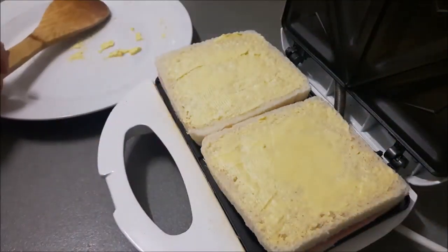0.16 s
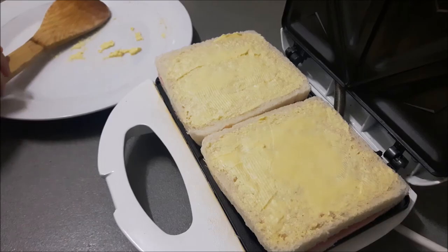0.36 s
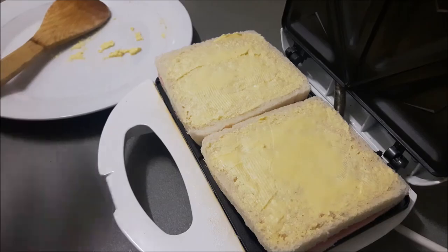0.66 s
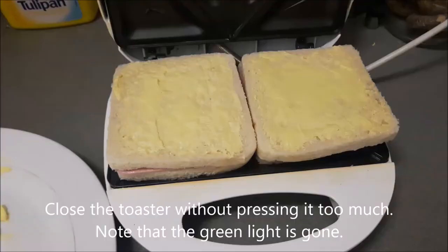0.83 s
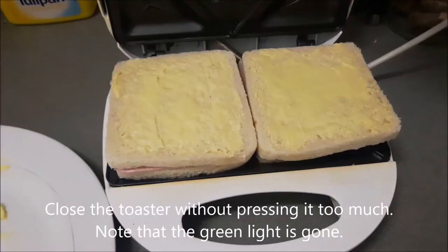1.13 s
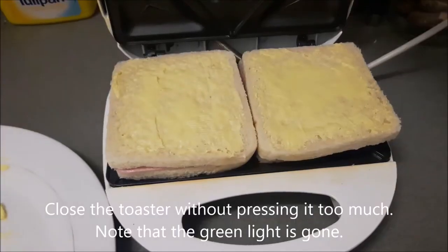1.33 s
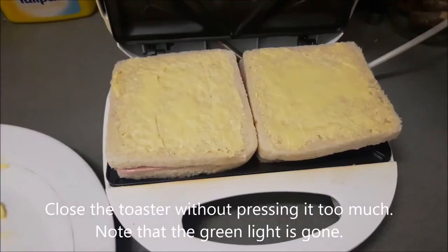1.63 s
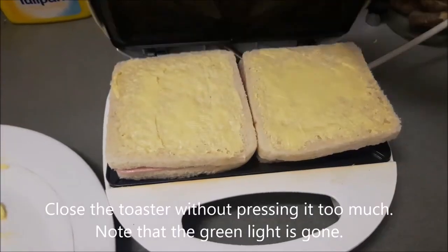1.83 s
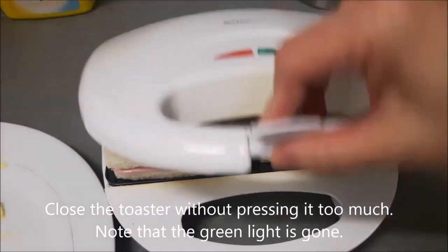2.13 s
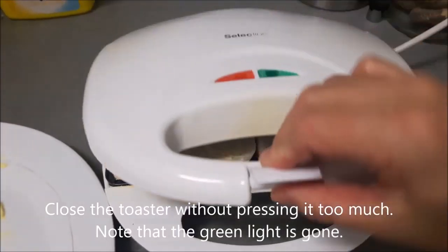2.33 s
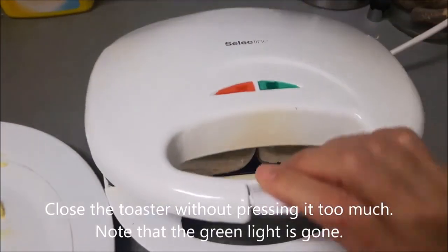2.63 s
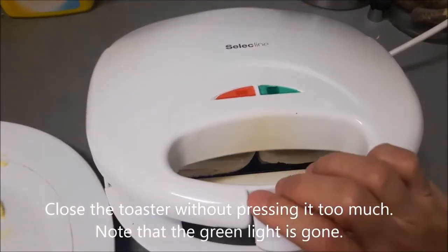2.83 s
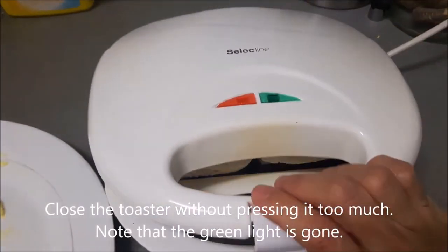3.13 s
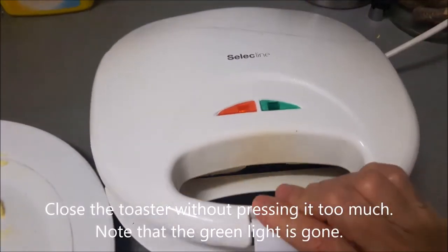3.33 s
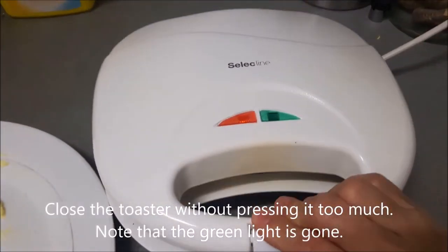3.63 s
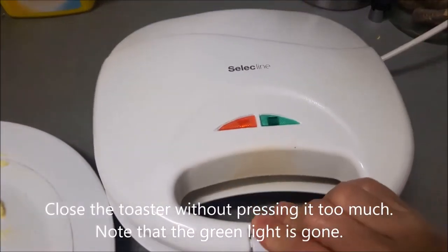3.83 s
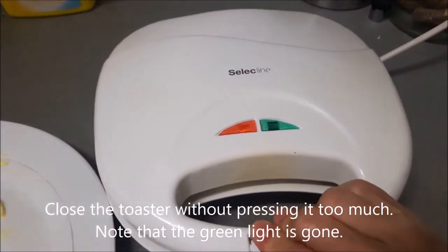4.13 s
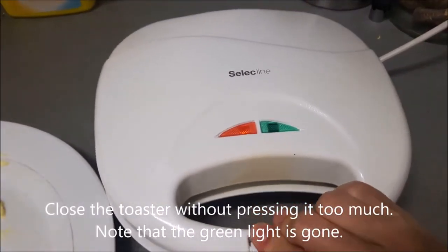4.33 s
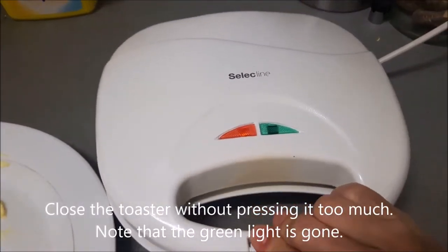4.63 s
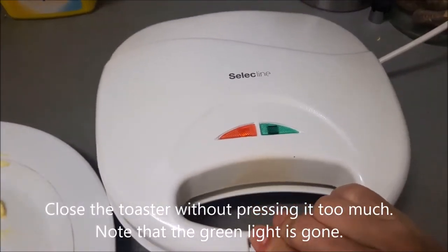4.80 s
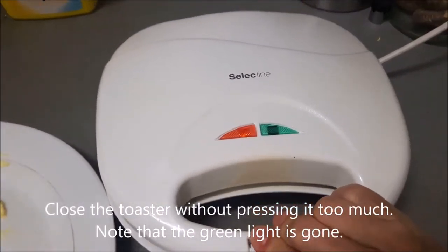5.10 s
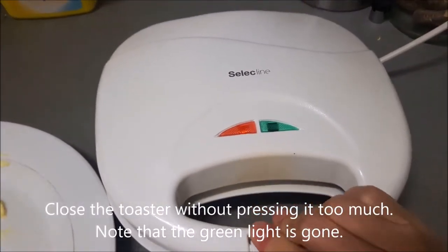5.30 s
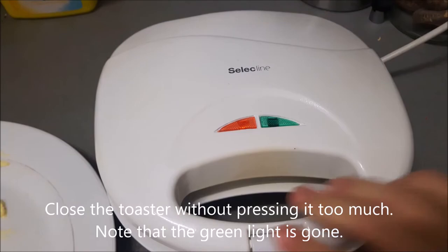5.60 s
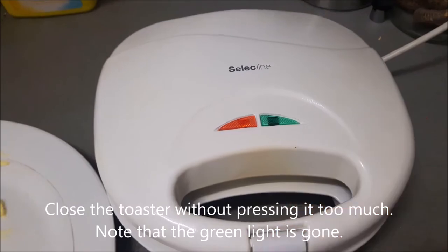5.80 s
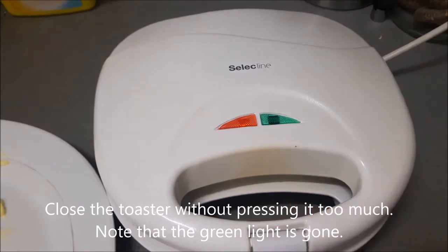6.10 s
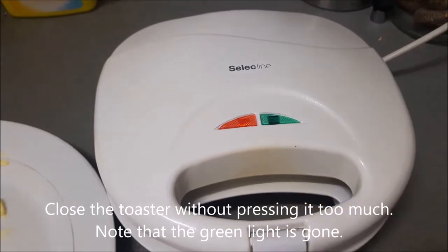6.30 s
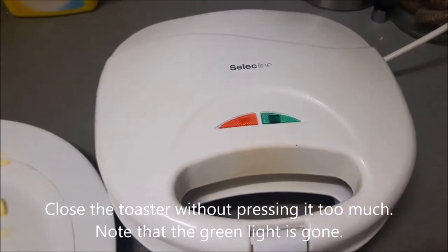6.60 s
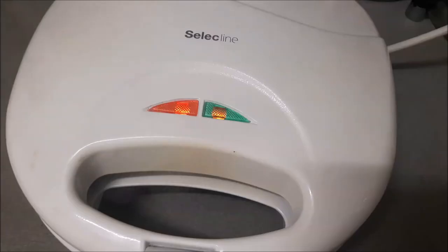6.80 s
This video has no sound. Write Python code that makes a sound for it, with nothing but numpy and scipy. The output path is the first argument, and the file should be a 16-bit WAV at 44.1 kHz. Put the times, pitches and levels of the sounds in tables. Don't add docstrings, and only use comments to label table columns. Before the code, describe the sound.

Brief bright plate clatter, a pause, then light plastic knocks, a hollow lid slam and latch, a sharp hot-fat sizzle dulling into quiet.

```python
import sys
import numpy as np
from scipy import signal
from scipy.io import wavfile
from scipy.ndimage import uniform_filter1d

SR = 44100
rng = np.random.default_rng(int(sys.argv[2]) if len(sys.argv) > 2 else 0)


def transcribe(u):
    v = np.clip(np.atleast_2d(u).T, -1, 1)
    q = np.round(v * 32767).astype(np.int16)
    wavfile.write(sys.argv[1], SR, q)


def voltage_ratio(decibels):
    exponent = np.asarray(decibels, float) / 20
    return 10 ** exponent


N = 306495


def evened(x):
    return x / np.sqrt(np.mean(x ** 2) + 1e-20)


def peaked(x):
    return x / abs(x).max()


def add(mix, s, sound):
    part = mix[round(s * SR):][:len(sound)]
    part += sound[:len(part)]


def read(points, hz):
    f, value = np.transpose(points)
    return np.interp(np.log(hz + 1), np.log(f + 1), value)


def coloured(x, points):
    hz = np.fft.fftfreq(4096, 1 / SR)
    log_gain = np.log(voltage_ratio(np.maximum(read(points, abs(hz)), -90)))
    taps = np.fft.ifft(np.exp(np.conj(signal.hilbert(log_gain)))).real[:2048]
    return signal.oaconvolve(np.atleast_2d(x), taps[None], axes=1)[:, :x.shape[-1]].reshape(x.shape)


def band(x, lo_hz, hi_hz):
    return signal.sosfilt(signal.butter(2, [lo_hz, min(hi_hz, .45 * SR)], "band", fs=SR, output="sos"), x)


def flicker(size, depth_db):
    wander = uniform_filter1d(uniform_filter1d(rng.standard_normal(N), size), size)
    return voltage_ratio(depth_db * evened(wander))


def plateau(t, start, length):
    edge_s = 0.0092
    return (np.tanh((t - start) / edge_s) - np.tanh((t - start - length) / (3 * edge_s))) / 2


def decay(t, t60):
    return voltage_ratio(-60 * t / t60)


def smeared(bursts, tail_s):
    return signal.lfilter([1], [1, -np.exp(-1 / (tail_s * SR))], bursts)


def ringing(t, hz, t60, rise_s):
    return np.sin(2 * np.pi * hz * t) * decay(t, t60) * np.minimum(t / rise_s, 1)


def struck(modes, rattle, blows):
    t, out = np.arange(SR // 2) / SR, np.zeros(N)
    hz, ring_db, t60 = np.transpose(modes)[:, :, None]
    rings = voltage_ratio(ring_db - 60 * t / t60) * np.sin(2 * np.pi * hz * t)
    for s, db, rattle_db, rattle_t60, hard_hz in blows:
        ring = (rings / np.hypot(1, hz / hard_hz)).sum(axis=0) * np.minimum(t / 0.00078, 1)
        shake = coloured(rng.standard_normal(len(t)) * decay(t, rattle_t60), rattle)
        shake = signal.lfilter(*signal.butter(2, min(0.39 * hard_hz, .45 * SR), fs=SR), shake)
        add(out, s, voltage_ratio(db) * peaked(ring) + voltage_ratio(rattle_db) * peaked(shake))
    return out


# start_s, spitting_db at the open edge, bubbling_db under the bread
FAT = [(0, -64, -64), (.52, -65.5, -67.5), (.65, -63, -61), (.888, -66, -66.5), (1.5, -59, -61.5),
       (2.1, -56.5, -59.5), (2.22, -53, -52.5), (2.58, -60.5, -61), (2.73, -53.5, -56), (2.958, -47.5, -56),
       (3.3, -42, -53.5), (3.52, -46.5, -52.5), (3.66, -50, -53.5), (3.9, -50.5, -54), (4.3, -58, -53.5),
       (5.2, -67, -63), (6.13, -81, -71), (6.701, -79.5, -69.5)]


def fat_db(t, axis):
    rows = np.array(FAT)
    return np.interp(t, rows[:, 0], rows[:, axis])


def hiss():
    return voltage_ratio(-78) * band(rng.standard_normal(N), 9000, 19000)


# pitch_hz, level_db, waver_db
HUM = [(49, -16, 1.5), (100, -9, 3), (147.4, 0, 1.5), (197, -17, 3), (295.5, -11, 2.5), (344, -20, 4),
       (400, -19, 4), (443, -21, 4)]
# start_s, length_s, extra_db
SWELLS = [
    (4.71, .18, 9),
    (5.03, .09, 7),
    (5.19, .26, 11),
]
SWELL_HZ = 295.5


def hum():
    t, out = np.arange(N) / SR, np.zeros(N)
    swell_db = sum(db * plateau(t, s, length) for s, length, db in SWELLS)
    for hz, db, waver_db in HUM:
        phase = 2 * np.pi * hz * np.cumsum(flicker(size=5000, depth_db=.03)) / SR
        level = voltage_ratio(db + swell_db * (hz == SWELL_HZ)) * flicker(size=2500, depth_db=waver_db)
        out += level * np.sin(phase)
    level = voltage_ratio(-57.5 + 0.074 * (fat_db(t, axis=2) + 56.5))
    return level * flicker(size=4000, depth_db=1.3) * evened(out)


# pitch_hz, density_db
WASH = [(15, -36.5), (25, -16), (54, -15), (92, -13), (150, -5), (220, -14), (306, -10), (593, -11),
        (731, -13.5), (870, -14), (1600, -24.5), (2080, -31), (3520, -120)]


def wash():
    t = np.arange(N) / SR
    noise = coloured(rng.standard_normal(N) * flicker(size=700, depth_db=1.5), WASH)
    follows_bubbling = voltage_ratio(-57.5 + 0.48 * (fat_db(t, axis=2) + 60))
    settling = voltage_ratio(-41 - 60 * t / 0.18)
    return (follows_bubbling + settling) * noise / np.std(band(noise, 200, 1200))


def bubbles(per_s, spread_db, tail_s, smooth):
    clumps = flicker(size=300, depth_db=4.5)
    sizes = voltage_ratio(spread_db * np.minimum(rng.exponential(1, N), 4.5))
    bursts = sizes * (rng.random(N) < clumps * per_s / SR)
    return rng.standard_normal(N) * (evened(smeared(bursts, tail_s)) + smooth)


# pitch_hz, density_db
FRYING = [(650, -24.5), (1100, 1), (1160, -16), (1280, -7), (1650, -7.5), (1820, -1.5), (2520, -1.5),
          (3460, -8.5), (4100, -4.5), (5860, -17), (7000, -13.5), (9100, -19.5), (15400, -120)]


def frying():
    steam = evened(coloured(bubbles(540, 2.3, 0.0014, 2.45), FRYING))
    return voltage_ratio(fat_db(np.arange(N) / SR, axis=2) - 3) * flicker(size=2500, depth_db=1.2) * steam


# pitch_hz, density_db
SIZZLE = [(2650, -61.5), (4500, -21.5), (5820, -15), (6270, -15), (6870, -13), (8110, -5.5), (9890, 2),
          (11400, -3.5), (12500, -10), (15100, -9.5), (16200, -10.5)]
# pitch_hz, density_db
SIZZLE_SHUT = [(3240, -26), (5500, -11), (6380, -19), (9720, 0), (11500, -7.5), (12400, -12.5),
               (15100, -17), (16200, -9.5)]
# start_s, extra_db, length_s
SURGE = [
    (2.89, -7, 0.013),
    (2.944, 5.5, 0.072),
    (3.054, 2.5, 0.13),
    (3.183, 7.5, 0.025),
    (3.24, 8.5, 0.083),
    (3.35, 6, 0.12),
]


def sizzle():
    t = np.arange(N) / SR
    lull_db = -1.5 * plateau(t, 3.1, 3.46 - 3.1)
    surge_db = lull_db + sum(db * plateau(t, s, length) for s, db, length in SURGE)
    steam = bubbles(1200, 2.5, 0.00043, 1.0)
    shut = np.interp(t, (3.3, 4.3), [0, 1])
    sound = (1 - shut) * evened(coloured(steam, SIZZLE)) + shut * evened(coloured(steam, SIZZLE_SHUT))
    return voltage_ratio(fat_db(t, axis=1) + surge_db) * sound


# start_s, level_db, body_db
SPITS = [(6.422, -69, -52), (0.7485, -37, -44), (0.76, -37, -66), (1.322, -38, -38.5), (1.4254, -34, -49),
         (1.546, -36, -32.5), (1.589, -32.5, -35.5), (1.6576, -36, -33.5), (1.713, -41, -42),
         (1.763, -38, -66), (1.885, -44, -65), (1.947, -39, -34), (2.017, -26.5, -35), (2.1697, -30.5, -55),
         (2.2036, -28, -50), (2.2235, -31, -46), (2.241, -26.5, -34), (2.374, -40, -61), (2.418, -38, -56),
         (2.8604, -34, -31.5), (5.692, -63.5, -41), (6.689, -68, -51)]
# start_s, level_db, body_db
PRESSED_SPITS = [(2.7062, -44, -54), (2.7379, -41, -51), (2.7525, -36, -48), (2.7646, -38, -60),
                 (2.7721, -32, -60), (2.7868, -34, -58), (2.7979, -40, -60), (2.8185, -38, -60),
                 (2.8329, -37, -60), (2.8506, -38, -57), (2.885, -38, -60), (2.8959, -40, -60),
                 (2.9053, -21, -48), (2.9434, -22, -53), (2.9667, -27, -48), (2.9844, -21, -56),
                 (2.9956, -24, -52), (3.0356, -30, -60), (3.0541, -27, -55), (3.0582, -24, -51),
                 (3.0696, -24, -60), (3.0833, -24, -60), (3.1004, -28, -59), (3.1066, -25, -60),
                 (3.1167, -27, -60), (3.1218, -30, -60), (3.1385, -24, -60), (3.149, -31, -60),
                 (3.1731, -30, -57), (3.1872, -30, -60), (3.2004, -25, -45), (3.213, -23, -48),
                 (3.2462, -25, -58), (3.2593, -22, -60), (3.2896, -23, -54), (3.2956, -23, -60),
                 (3.3061, -24, -60), (3.3168, -20, -51), (3.3295, -28, -60), (3.3379, -18, -60),
                 (3.3482, -27, -60), (3.3551, -26, -52), (3.3817, -25, -60), (3.3948, -25, -57),
                 (3.411, -29, -60), (3.4152, -20, -51), (3.463, -27, -60), (3.4675, -28, -57),
                 (3.4734, -28, -60), (3.4811, -31, -60), (3.4944, -27, -60), (3.502, -31, -56),
                 (3.5077, -30, -60), (3.5267, -30, -60), (3.5514, -35, -60), (3.5691, -33, -60),
                 (3.6166, -37, -60)]
# start_s, level_db, body_db
SEAM_SPITS = [(3.8435, -46, -61), (4.1155, -46, -61), (4.134, -41, -56), (4.1829, -40, -57),
              (4.2133, -39, -57), (4.4747, -39, -43), (4.547, -43, -59), (4.686, -46, -64),
              (4.786, -47, -56), (4.864, -48, -65), (4.9933, -44, -64), (5.1178, -49, -65),
              (5.2245, -60, -69), (5.2899, -54, -71), (5.4564, -42, -50)]
# start_s, level_db
CREAKS = [(1.2915, -66), (1.4122, -55), (1.4451, -51), (1.4614, -44), (1.508, -42), (1.5293, -42),
          (1.557, -38), (1.6177, -43), (1.6506, -34), (1.6968, -37.5), (1.7345, -51), (1.771, -50),
          (1.798, -42), (1.8093, -34.5), (1.8524, -48), (2.0294, -36), (2.0424, -42), (2.0544, -47),
          (2.0884, -44), (2.103, -38), (2.125, -48), (2.156, -55), (2.2688, -33.5), (2.291, -40),
          (2.345, -45), (2.4713, -54), (4.702, -51), (5.5943, -57), (5.6114, -63), (5.7084, -59)]
# start_s, level_db
CRACKLES = [(0.0288, -48), (0.0639, -51), (0.0826, -41), (0.1825, -46), (0.2271, -47), (0.2326, -44),
            (0.2528, -46), (0.2922, -44), (0.2993, -48), (0.3084, -47), (0.3775, -52), (0.4102, -51),
            (0.6093, -47), (0.647, -50), (0.6623, -45), (0.6768, -42), (0.7224, -47), (0.7836, -42),
            (0.7994, -49), (0.8455, -41), (0.8576, -48), (1.2815, -59), (1.3023, -57), (1.38, -49),
            (1.4044, -49), (1.4148, -46), (1.4456, -43), (1.4676, -44), (1.474, -45), (1.5089, -44),
            (1.529, -45), (1.7356, -34), (1.7476, -37), (1.8531, -37), (1.8918, -37), (1.9111, -43),
            (1.9245, -42), (1.9636, -36), (1.9951, -36), (2.0888, -39), (2.1018, -39), (2.1216, -39),
            (2.1377, -42), (2.157, -39), (2.2332, -29), (2.2557, -33), (2.2834, -35), (2.4083, -36),
            (2.4243, -40), (2.4622, -44), (2.6015, -39), (2.6341, -39)]
# pitch_hz, level_db, t60_s
POP_RINGS = [(1620, -10.5, 0.033), (2720, 1, 0.0062), (4080, -3.5, 0.0083)]


def spits():
    trim_db = -2.5
    rows = SPITS + [(s, db - .6, body_db) for s, db, body_db in SEAM_SPITS]
    rows = rows + [(s, -90, db - 2.5) for s, db in CREAKS]
    rows += [(s, db + trim_db, body_db) for s, db, body_db in PRESSED_SPITS]
    rows += [(s, db + trim_db, db - 19) for s, db in CRACKLES]
    t, out = np.arange(2000) / SR, np.zeros(N)
    a, b = rng.standard_normal((2, len(rows), len(t)))
    fizz, thinness = rng.standard_normal((2, len(rows), 1))

    burst = np.sign(a) * decay(t, .0018)
    tail = 0.13 * a * decay(t, 0.1) + 0.3 * abs(fizz) * a * decay(t, 0.009)
    snaps = coloured(burst + tail, SIZZLE)
    snaps = snaps - np.clip(0.12 + 0.25 * thinness, 0, 1) * np.roll(snaps, 1, axis=1)

    pops = 0.68 * band(b * decay(t, 0.0084), 1700, 5500)
    for hz, db, t60 in POP_RINGS:
        detune, strength = rng.standard_normal((2, len(rows), 1))
        pops = pops + voltage_ratio(db + 2.0 * strength) * ringing(t, hz * (1 + 0.014 * detune), t60, .0005)
    for (s, db, body_db), snap, pop in zip(rows, snaps, pops):
        add(out, s, voltage_ratio(db + 2.5) * peaked(snap) + voltage_ratio(body_db - 2.0) * peaked(pop))
    return out


# start_s, length_s, level_db
HANDLING = [
    (1.489, 0.54, -65),
    (1.643, 0.23, -63),
    (2.185, 0.082, -48),
    (2.51, 0.13, -65),
]
# from_hz, to_hz
TICK_HZ = [
    (450, 1050),
    (800, 2200),
    (2100, 3500),
    (3600, 5300),
]


def rustle():
    t = np.arange(N) / SR
    ticks = voltage_ratio(3.0 * np.minimum(rng.exponential(1, N), 2.4)) * (rng.random(N) < 640 / SR)
    part, grit = rng.integers(0, len(TICK_HZ), N), rng.standard_normal(N)
    sound = np.zeros(N)
    for k, (lo_hz, hi_hz) in enumerate(TICK_HZ):
        puffs = grit * smeared(ticks * (part == k), 0.0025)
        sound += voltage_ratio(-3.5 * k) * evened(band(puffs, lo_hz, hi_hz))
    return evened(sound) * sum(voltage_ratio(db) * plateau(t, s, length) for s, length, db in HANDLING)


# start_s, level_db, pitch_hz, rise_s, t60_s
BOOMS = [
    (.001, -46, 144, .005, 0.4),
    (0.482, -39.5, 149, 0.024, 0.54),
    (0.551, -37.5, 100, 0.022, .4),
    (0.629, -45.5, 150, 0.03, 0.56),
    (.7, -40.5, 101, .03, 0.23),
    (1.674, -35, 96.8, 0.026, 0.44),
    (1.749, -45.5, 192, 0.023, 0.22),
    (1.868, -39, 102, 0.024, 0.17),
    (2.022, -27.5, 99, 0.011, 0.27),
    (0.149, -42.5, 100.4, 0.028, 0.28),
]


def booms():
    t, out = np.arange(SR // 4) / SR, np.zeros(N)
    for s, db, hz, rise_s, t60 in BOOMS:
        fade_out = np.cos(2 * np.pi * t) ** 2
        add(out, s, voltage_ratio(db) * peaked(ringing(t, hz, t60, rise_s)) * fade_out)
    return out


# start_s, level_db, pitch_hz, upper_db
KNOCKS = [(1.647, -59, 490, -63), (1.667, -28, 679, -52), (1.666, -37, 396, -57), (1.709, -47, 759, -45),
          (1.777, -38, 366, -63), (1.869, -44, 536, -50), (1.956, -41.5, 386, -46), (2.201, -35, 524, -40),
          (2.222, -32, 650, -52), (2.239, -24.5, 757, -62), (2.261, -56, 301, -53), (2.271, -47, 877, -56),
          (2.306, -38, 533, -52), (2.333, -42.5, 345, -52), (2.427, -42, 510, -68),
          (2.525, -31, 390, -41.5), (2.546, -25.5, 434, -42), (2.577, -38, 414, -58),
          (2.863, -60, 896, -37), (3.146, -42, 550, -42.5), (5.594, -48, 345, -50.5),
          (5.658, -52, 301, -51), (5.692, -42.5, 533, -45), (5.952, -53, 377, -50.5),
          (6.434, -53, 504, -59), (6.479, -44, 298, -45.5), (6.536, -50, 326, -49.5),
          (6.599, -50, 301, -59.5), (6.686, -41.5, 345, -45.5), (6.701, -57, 533, -49)]
# start_s, level_db, pitch_hz, upper_hz, upper_db
CATCH = [(1.589, -36.5, 500, 2300, -46), (1.727, -36.5, 504, 1510, -50.5), (1.801, -42, 496, 1270, -42.5),
         (1.825, -36.5, 477, 2080, -33), (1.826, -42, 480, 1680, -36.5), (2.002, -30.5, 995, 1600, -26),
         (2.004, -34.5, 380, 1740, -37), (2.0143, -33, 510, 2180, -33), (2.181, -50, 503, 2200, -42.5),
         (2.240, -25.5, 358, 1830, -38), (2.861, -40, 900, 1960, -36), (4.254, -38, 430, 2460, -37.5),
         (4.643, -48, 675, 1840, -45.5), (5.693, -61, 700, 1790, -42), (5.698, -48, 540, 990, -47),
         (5.594, -48, 620, 2600, -54), (2.86, -63, 2800, 4190, -36), (6.687, -50, 600, 1720, -48)]


def knocks():
    t, out = np.arange(SR // 4) / SR, np.zeros(N)
    shell = [(s, db, hz, 0.044, 952, upper_db) for s, db, hz, upper_db in KNOCKS]
    latch = [(s, db, hz, 0.025, upper_hz, upper_db) for s, db, hz, upper_hz, upper_db in CATCH]
    for s, db, hz, t60, upper_hz, upper_db in shell + latch:
        a, b = rng.standard_normal((2, len(t)))
        low_rattle = band(a * decay(t, 2.0 * t60), 0.61 * hz, 1.53 * hz)
        low = peaked(ringing(t, hz, t60, 0.00068)) + 0.38 * peaked(low_rattle)
        upper_rattle = band(b * decay(t, 0.71 * t60), 0.97 * upper_hz, 1.47 * upper_hz)
        upper = peaked(ringing(t, upper_hz, 0.72 * t60, 0.00049)) + 0.64 * peaked(upper_rattle)
        add(out, s, voltage_ratio(db) * peaked(low) + voltage_ratio(upper_db + 0.5) * peaked(upper))
    return out


# pitch_hz, level_db, t60_s
LID = [(191.6, -12, 0.2), (345, -10.5, 0.053), (384, 8.5, 0.041), (496, 6, 0.023), (700, -12, 0.055),
       (900, -9, 0.025), (1400, -10, 0.05), (1560, 5.5, 0.02), (2030, -5, 0.0097)]
# pitch_hz, density_db
LID_RATTLE = [(41, -23), (70, -1.5), (115, -6), (278, -12), (367, -9.5), (680, -7), (1300, -2.5),
              (1590, -6.5), (3300, -9), (9070, -6), (11500, -30), (15600, -62), (22000, -120)]
# start_s, ring_db, rattle_db, rattle_t60_s, hardness_hz
SLAM = [
    (2.017, -50, -35.5, 0.0873, 8100),
    (2.0148, -40.5, -22.5, 0.011, 24000),
    (2.016, -7, -14, 0.028, 2510),
    (2.022, -22, -20, 0.06, 1520),
    (2.0278, -19, -42, 0.093, 1500),
    (2.0425, -28, -32, 0.03, 1800),
    (2.0292, -25, -34, .045, 14000),
    (2.0502, -33, -36, .04, 1700),
    (2.0651, -40, -38, .035, 2600),
    (2.0889, -48, -42, .03, 5000),
]


def lid_slam():
    return struck(LID, LID_RATTLE, SLAM)


def rim():
    t = np.arange(N) / SR
    low, high = (np.sin(2 * np.pi * hz * t) for hz in (2203, 2214.5))
    return voltage_ratio(-35 - 60 * t / .32) * (low - 0.62 * high)


# start_s, level_db
BELLY = [
    (.459, -60),
    (.462, -27),
    (.479, -20),
    (.49, -28),
    (.512, -27),
    (.521, -50),
    (.558, -42),
    (.63, -64),
    (.7, -95),
]


def belly():
    s, db = np.transpose(BELLY)
    t = np.arange(s[0], s[-1], 1 / SR)
    out = np.zeros(N)
    phase = 2 * np.pi * 2238 * t + 2.7 * np.sin(2 * np.pi * 11 * t)
    add(out, s[0], voltage_ratio(np.interp(t, s, db)) * np.sin(phase))
    return out


def fine_rings():
    lo_hz, hi_hz = 2600, 15200
    place, size, life = rng.random((70, 3)).T
    hz = lo_hz + (hi_hz - lo_hz) * place ** 2.2
    db = -29 - 5 * np.log2(hz / lo_hz) - 9 * size
    return list(zip(hz, db, .13 * (0.71 + 1.2 * life)))


# pitch_hz, level_db, t60_s
PLATE_FADING = [(184, 2.5, 0.34), (377, -1, 0.23), (531, -3.5, 0.091), (798, -2, 0.21), (1670, -7.5, 0.18),
                (2840, 1, 0.017), (3080, -20, 0.15)]
# pitch_hz, level_db, t60_s
PLATE_TAPPED = [(377, -11, 0.26), (530, 1, 0.043), (743, -15.5, .05), (1000, -5, 0.027), (1449, -18, 0.18),
                (1540, -2.5, .07), (1740, -10, .05), (1954, -1.5, .04), (2050, -12.5, 0.042),
                (2220, -28, .2), (2620, -12.5, 0.036), (2770, -6.5, .045), (4183, -32.5, .1)]
PLATE_HZ = [147, 187, 284, 372, 477, 806, 1444, 1690, 1976, 2235, 2243, 2471, 2777, 2838, 3033, 3166, 3951,
            3999, 4185, 4383, 4490, 4996, 5238, 6100, 7311, 8613, 9900, 10030, 11120, 12900, 234, 524, 1381,
            2195, 727, 3418, 690]
# level_db, t60_s
PLATE_RINGS = [(-19, 0.46), (-24.5, 0.57), (-17, 0.13), (-9, 0.24), (-20.5, .1), (-13, 0.2), (-7, 0.18),
               (-14, 0.13), (-28, 0.13), (-34.5, 0.11), (-34, 0.1), (-24, 0.2), (-10, 0.22), (-13.5, 0.16),
               (-11, 0.25), (-18, 0.22), (-24, 0.18), (-24, 0.22), (-10, 0.14), (-16.5, 0.11),
               (-21.5, 0.17), (-29.5, 0.23), (-25.5, 0.14), (-31.5, .15), (-18, 0.074), (-17, 0.18),
               (-21.5, 0.14), (-10, 0.082), (-25, 0.15), (-35, .12), (-21.5, .18), (-29.5, 0.12),
               (-19.5, .12), (-20, 0.06), (-11, 0.2), (-26, .17), (-23.5, .15)]
# pitch_hz, density_db
PLATE_RATTLE = [(59, -47.5), (100, -7.5), (560, -9.5), (650, -22.5), (791, -10.5), (1010, -29.5),
                (1410, -16.5), (1880, -20), (2220, -12.5), (3400, -21.5), (4600, -23.5), (10300, -31.5),
                (14000, -38)]
# start_s, ring_db, rattle_db, rattle_t60_s, hardness_hz
FADING = [
    (0.0005, -28, -24.5, 0.12, 3200),
]
TAPPED = [
    (.338, -27, -30.5, 0.088, 4017),
]
STRUCK = [
    (0.4592, -33.5, -27.5, .14, 22000),
    (.461, -11.5, -13, 0.045, 9000),
    (.4766, -17.5, -17, 0.11, 10000),
    (.503, -26.5, -24.5, 0.18, 9000),
]


def plate():
    full = [(hz, db, t60) for hz, (db, t60) in zip(PLATE_HZ, PLATE_RINGS)] + fine_rings()
    taps = struck(PLATE_FADING, PLATE_RATTLE, FADING) + struck(PLATE_TAPPED, PLATE_RATTLE, TAPPED)
    return taps + struck(full, PLATE_RATTLE, STRUCK)


# pitch_hz, t60_s
ROOM_T60 = [(200, 0.23), (1500, 0.18), (8000, 0.19)]


def room(x):
    taps = np.zeros(SR // 2)
    at = np.arange(200, len(taps) - 20, 20)
    taps[at + rng.integers(0, 20, len(at))] = rng.choice([-1., 1.], len(at))
    hz, t, z = signal.stft(taps, SR, nperseg=256)
    tail = signal.istft(z * decay(t, read(ROOM_T60, hz)[:, None]), SR, nperseg=256)[1]
    return signal.fftconvolve(x, tail / np.linalg.norm(tail))[:N]


def scene():
    hits = booms() + knocks() + lid_slam() + belly() + plate()
    hits = band(hits, 130, 18000)
    background = hiss() + hum() + wash() + frying() + sizzle() + spits() + rustle()
    mono = background + rim() + hits + voltage_ratio(-7) * room(hits)
    return np.array([mono, mono])


def roll_off(x):
    return signal.sosfilt(signal.butter(12, 16850, fs=SR, output="sos"), x)


# start_s, end_s
SHOTS = [
    (0, .888),
    (1.215, 6.764),
]
# pitch_hz, density_db
SIDE_HISS = [(60, -33.5), (200, -4), (660, -3.5), (2400, -5.5), (4200, -12.5), (6000, -28), (10000, -23),
             (16000, -29)]


def record(dry):
    t = np.arange(N) / SR
    (_, cut), (start, end) = SHOTS
    first = np.clip((cut - t) / 0.0019, 0, 1)
    second = np.clip(np.minimum((t - start) / 0.33, (end - t) / 0.0086), 0, 1)
    side = voltage_ratio(-82) * evened(coloured(rng.standard_normal(N), SIDE_HISS)) * flicker(size=3000, depth_db=3.5)
    low_pass = signal.firwin(1023, 15780, window=("kaiser", 8), fs=SR)
    limited = signal.oaconvolve(dry + [side, -side], low_pass[None], "same")
    return roll_off((first + second) * limited)


dry = scene()
out = record(dry)
transcribe(out)
```